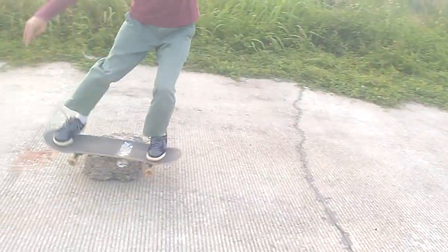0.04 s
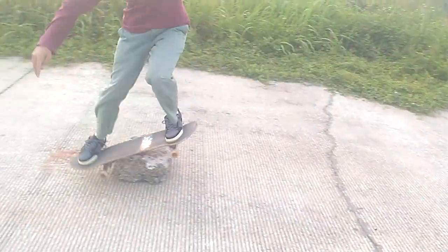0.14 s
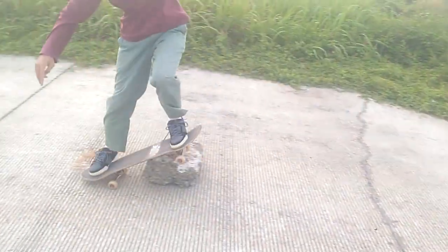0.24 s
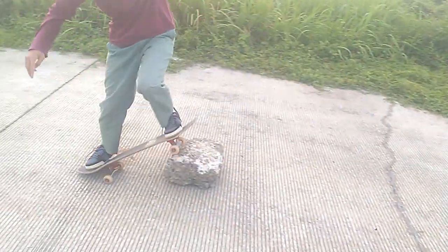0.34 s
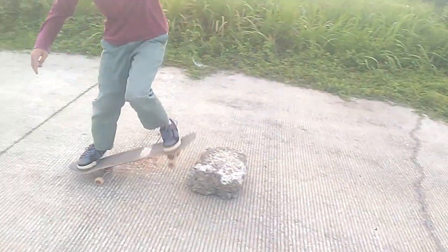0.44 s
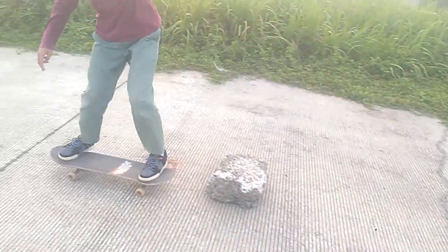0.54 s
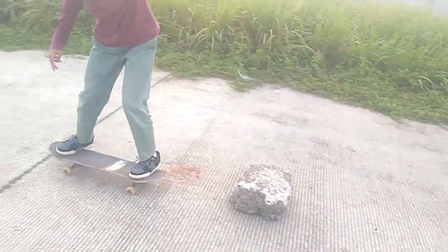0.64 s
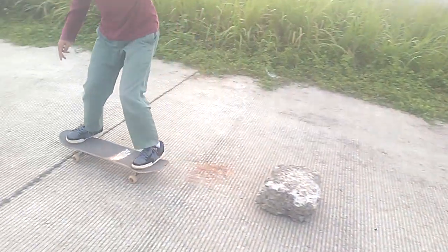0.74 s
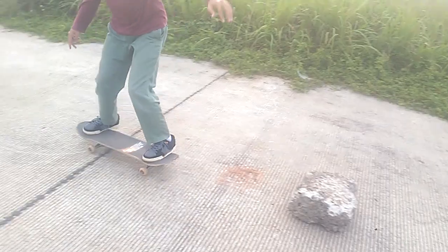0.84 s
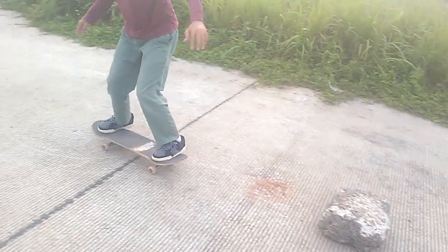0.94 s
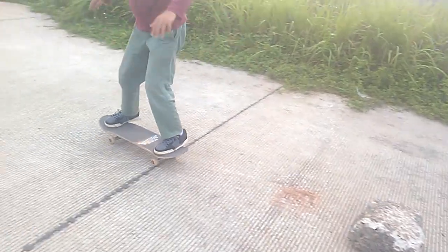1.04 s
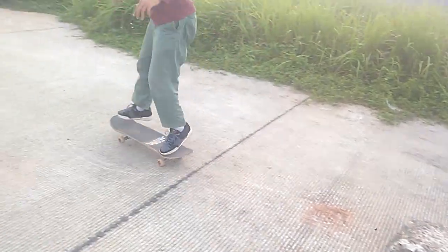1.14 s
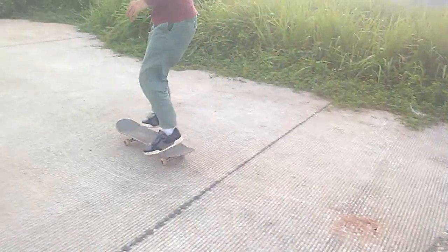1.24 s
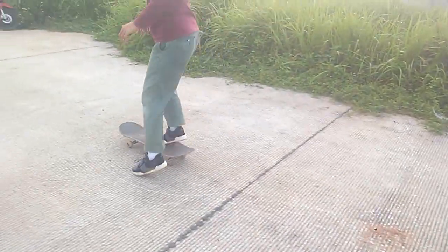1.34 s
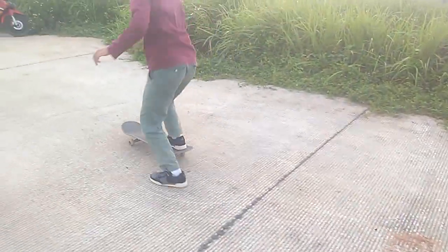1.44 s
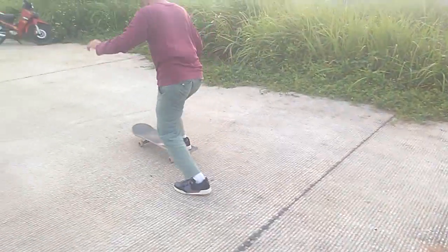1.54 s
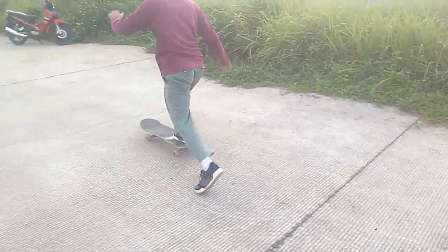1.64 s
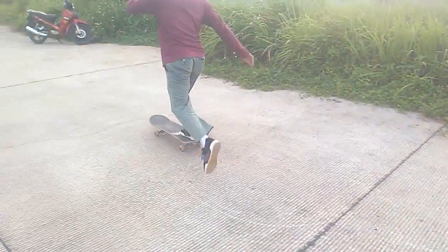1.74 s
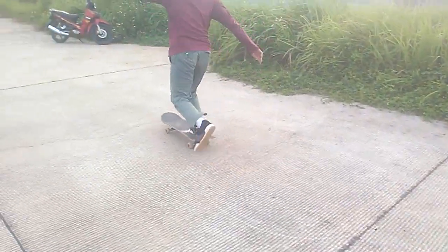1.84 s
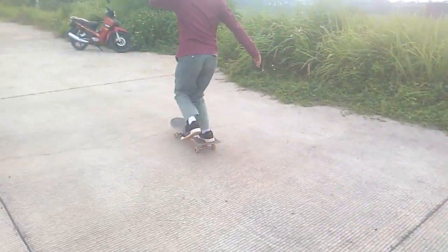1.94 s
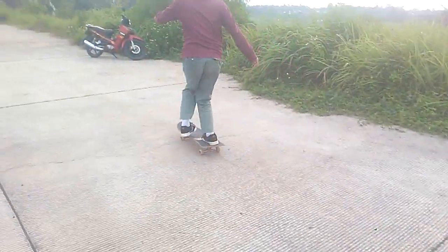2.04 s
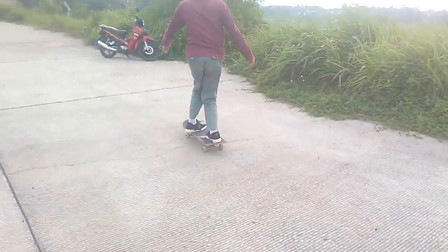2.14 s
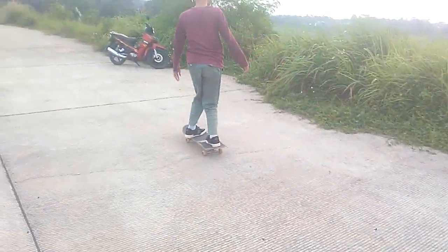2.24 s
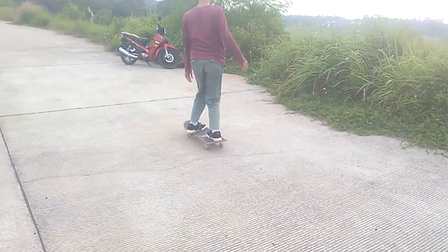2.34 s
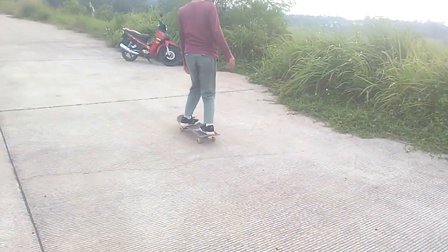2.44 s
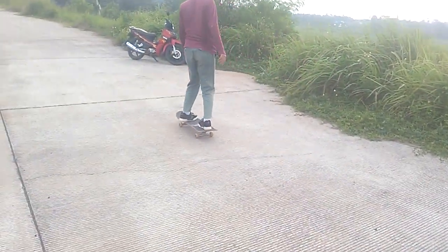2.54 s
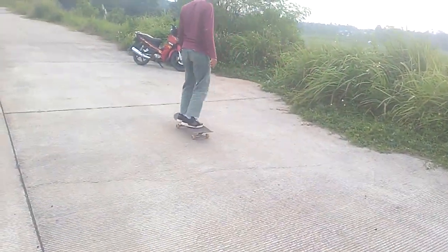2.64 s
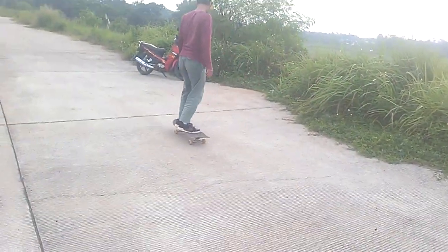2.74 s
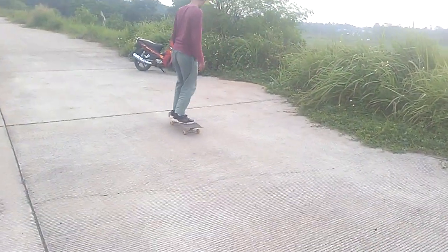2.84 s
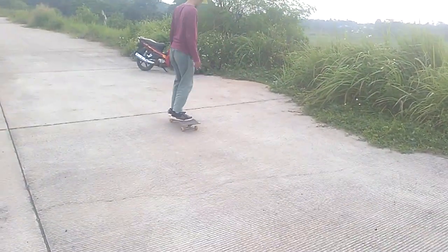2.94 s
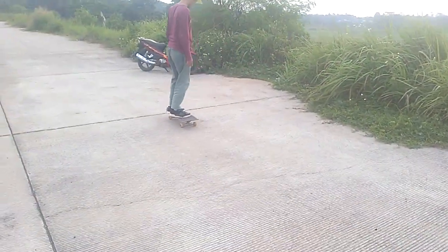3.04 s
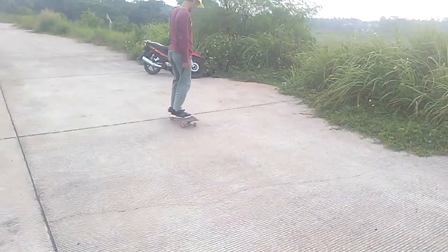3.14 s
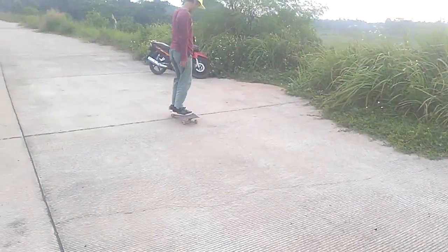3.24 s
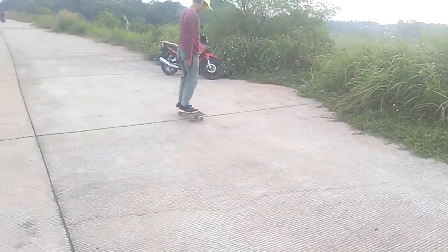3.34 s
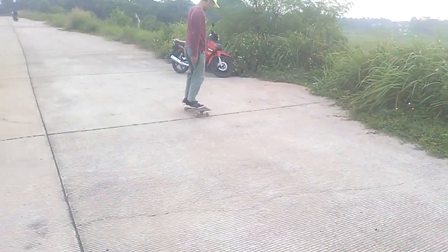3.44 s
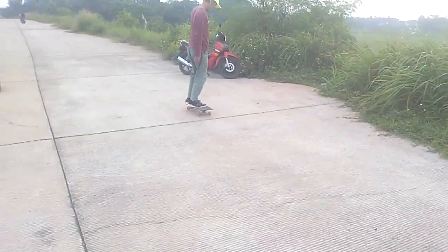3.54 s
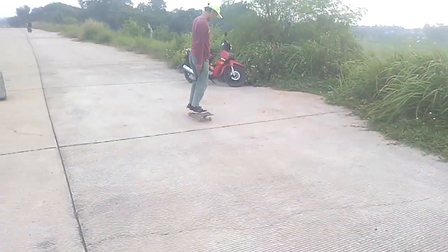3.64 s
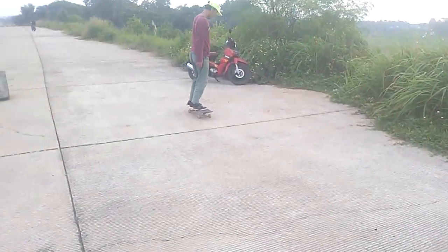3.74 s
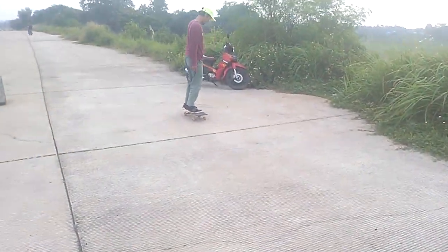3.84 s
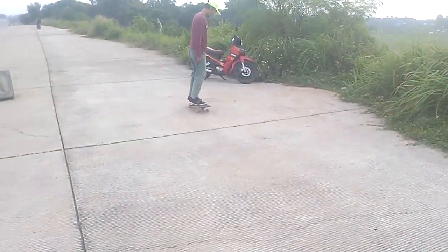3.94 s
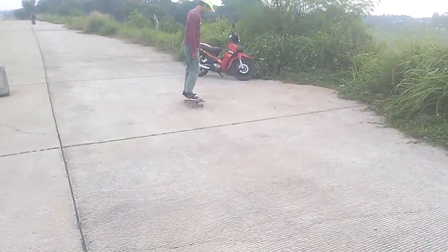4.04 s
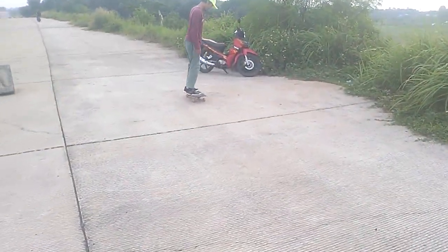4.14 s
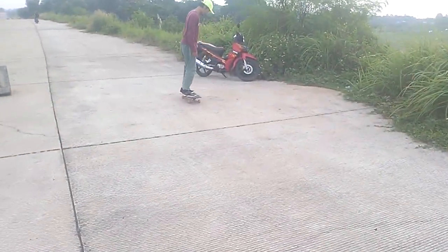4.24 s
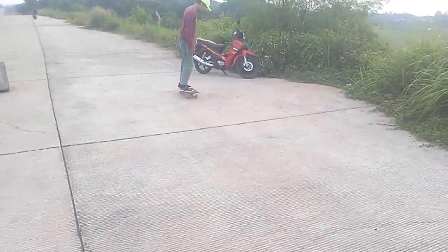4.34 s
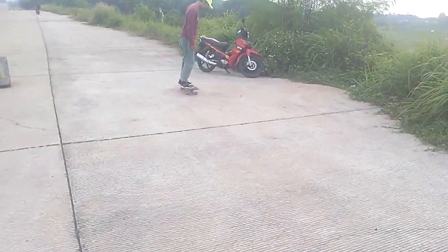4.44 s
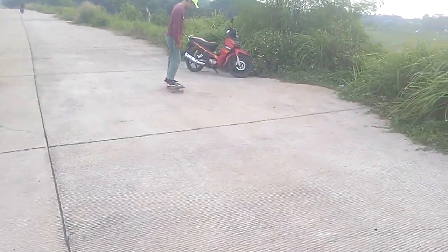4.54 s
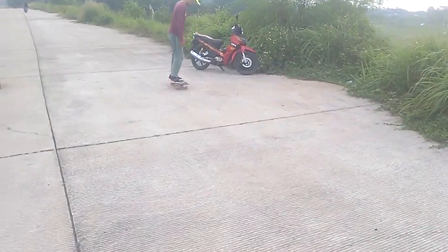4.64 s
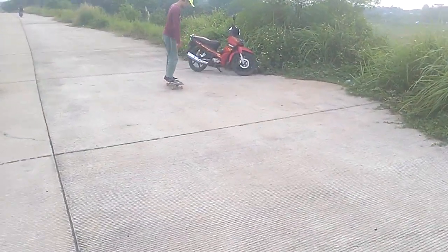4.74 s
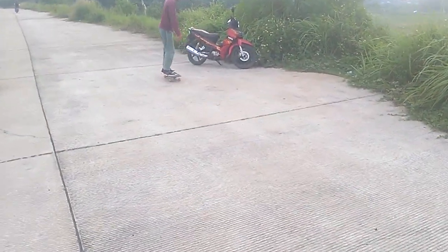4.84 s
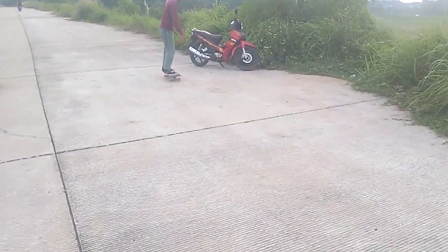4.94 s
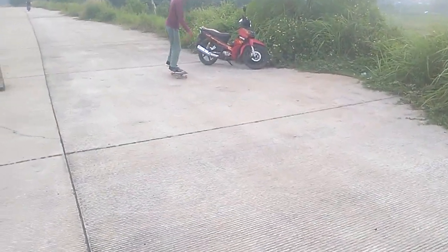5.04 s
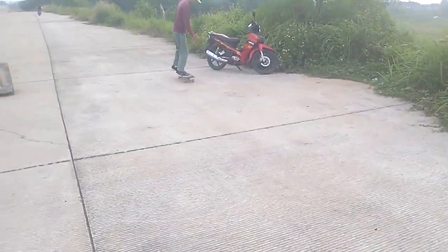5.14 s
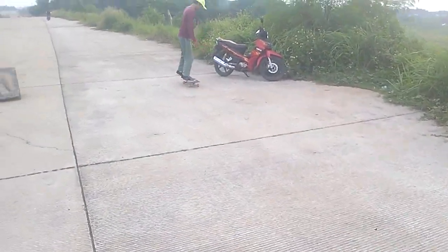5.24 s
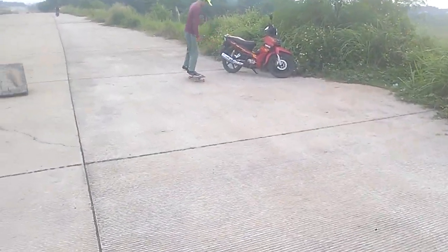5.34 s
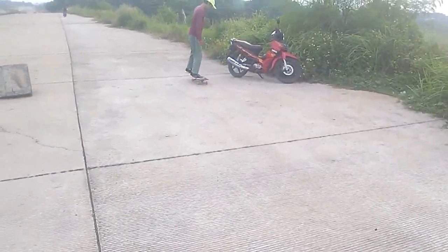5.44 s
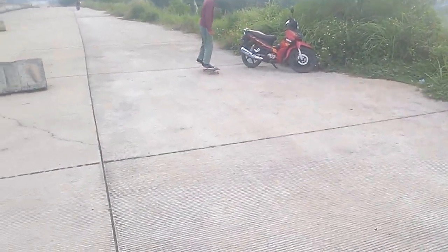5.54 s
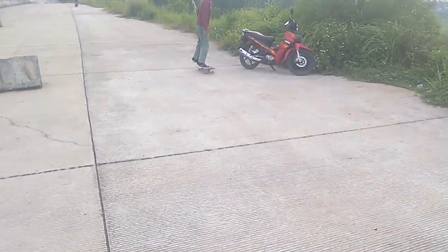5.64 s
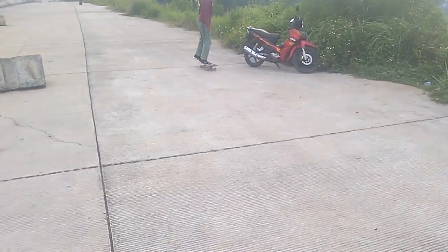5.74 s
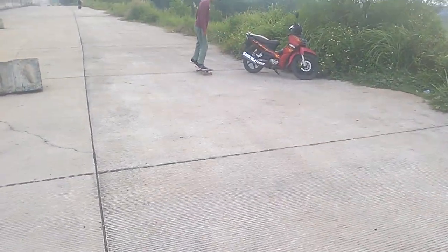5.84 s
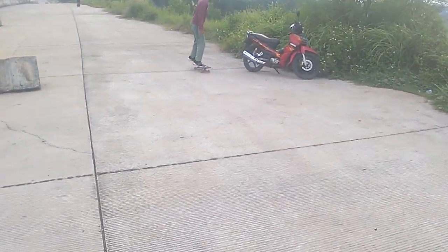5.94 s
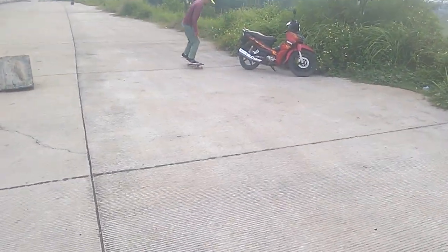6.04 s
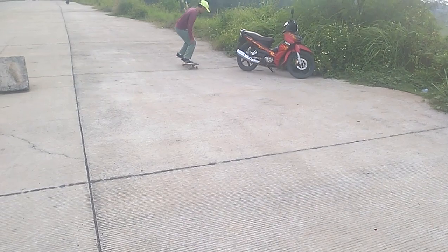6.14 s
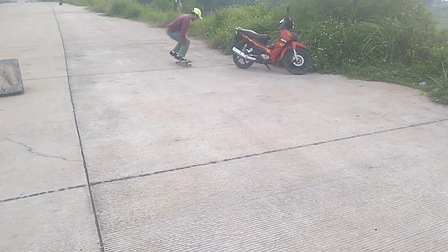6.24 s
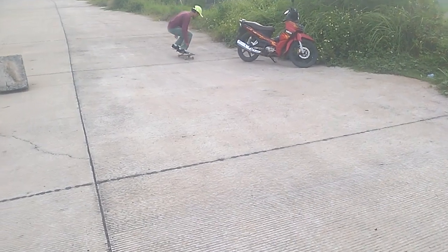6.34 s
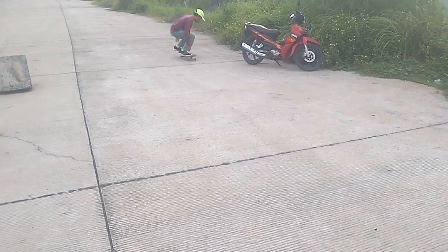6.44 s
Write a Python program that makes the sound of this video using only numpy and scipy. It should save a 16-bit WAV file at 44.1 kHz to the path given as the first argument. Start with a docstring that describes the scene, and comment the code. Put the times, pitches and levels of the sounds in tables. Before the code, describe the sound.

A skateboard scrapes and slams hard off a rock, very close to the microphone, with two overloaded wooden clacks in the first half second. Wheels then roar and rattle over rough concrete, with a cluster of knocks and brief squeaks between one and two seconds. A fluttering hum from the grooves follows as the board recedes along an open outdoor road, with faint low wind.

```python
"""Skateboard on a grooved concrete road

A board slides off a rock, lands with hard clacks close to the microphone and rolls away down the road.
Noise bursts shaped as wheel contact make roar, boom, rattle and hiss; sines at the groove rate make the hum.
Ringing deck modes make the slams and knocks, rough sine glides the squeaks, and low noise the wind.
The input clips wherever the sound passes full scale."""
import sys
import numpy as np
from scipy import signal
from scipy.fft import rfft, irfft
from scipy.io import wavfile
from scipy.ndimage import uniform_filter1d

SR = 44100
rng = np.random.default_rng(int(sys.argv[2]) if len(sys.argv) > 2 else 0)


def unload_audio(sound):
    """Save the sound as a 16-bit wav file, at the path given as the first command line argument."""
    columns = np.transpose(np.atleast_2d(sound))
    # keep every value between -1 and 1, then stretch to whole-number steps
    steps = np.round(np.clip(columns, -1, 1) * 32767)
    wavfile.write(sys.argv[1], SR, steps.astype(np.int16))


N = 286650
TIME = np.arange(N) / SR
HZ = np.fft.rfftfreq(N, 1 / SR)

# tone of the nearest concrete, rolled on or struck: frequency_hz, density_db (per Hz, relative)
NEAR_CONCRETE = [(300, -5.5), (420, -15), (530, 5.5), (660, 5.5), (880, 0), (1100, -4), (1450, -5),
                 (1950, -13.5), (2400, -17), (3000, -21), (3800, -32.5), (4700, -51.5)]
# tone of sand under or beside the wheels: frequency_hz, density_db (per Hz, relative)
SAND_TONE = [(3000, -3.5), (4000, -10), (4900, -17), (5900, -3), (6400, -5.5), (7200, -12.5), (8800, -1),
             (9800, -1), (11500, -11), (14000, -17.5)]


def amp(db):
    """Decibels to gain."""
    return 10 ** (np.asarray(db) / 20)


def unit(x):
    """Scales to rms 1."""
    return x / np.sqrt(np.mean(x ** 2) + 1e-20)


def curves(rows):
    """The columns of a table, joined by straight lines in time."""
    s, *columns = np.transpose(rows)
    return [np.interp(TIME, s, c) for c in columns]


def shape(points):
    """Gain at every frequency from a short spectrum that falls 30 dB per octave beyond its ends."""
    hz, db = np.transpose(points)
    octave, knots = np.log2(HZ + 1), np.log2(hz)
    beyond = abs(octave - np.clip(octave, knots.min(), knots.max()))
    return amp(np.interp(octave, knots, db) - 30 * beyond)


def colour(x, gain):
    """Minimum-phase filter with peak gain 1: each click rings after it strikes."""
    log_gain = np.log(np.maximum(gain / gain.max(), 1e-5))
    # folding the cepstrum onto positive times makes the filter causal
    cepstrum = irfft(log_gain, N) * (1 + np.sign(N / 2 - np.arange(N)))
    cepstrum[0] /= 2
    return irfft(rfft(x) * np.exp(rfft(cepstrum)), N)


def wander(rate_hz):
    """Slow random drift of rms 1: noise kept below about the given rate."""
    lowpass = np.exp(-(HZ / rate_hz) ** 2)
    return unit(irfft(rfft(rng.standard_normal(N)) * lowpass, N))


def add(mix, s, sound):
    """Mixes a sound in at time s."""
    part = mix[max(round(s * SR), 0):][:len(sound)]
    part += sound[:len(part)]


def swell(s, rise_s, fall_s):
    """A smooth rise to 1 at time s and a smooth fall, each 1/e at its given time from the peak."""
    width = np.where(TIME < s, rise_s, fall_s)
    return np.exp(-np.minimum(abs(TIME - s) / width, 6) ** 2)


def ramp(s, length_s):
    """A step from 0 to 1 around time s."""
    return np.clip((TIME - s) / length_s + .5, 0, 1)


def wind():
    """Low, lumpy buffeting at the microphone: noise whose level sways, with gusts and lulls."""
    # gusts and lulls: peak_s, half_length_s, level_db (over the breeze)
    gust_rows = [(0.22, 0.039, 13), (0.419, 0.06, 21), (0.702, 0.17, 18.5), (1.043, 0.073, 6.5),
                 (1.8, 0.33, -5.5), (2.426, .06, 10), (3.218, 0.089, 4), (3.596, 0.15, 0),
                 (3.935, 0.19, -4), (4.177, 0.066, 9), (4.914, .07, 7), (5.485, 0.035, 6),
                 (6.373, 0.027, -7)]
    # buffeting at the microphone: frequency_hz, density_db (per Hz, relative)
    buffet_tone = [(15, -68), (30, -14), (55, -1), (85, 0.5), (120, -3), (180, -8), (400, -34)]
    breeze_db, sway_db, sway_hz = -50, 1.4, 8
    lumps = amp(0.92 * wander(24)) * rng.standard_normal(N)
    gusts_db = sum(db * swell(s, half, half) for s, half, db in gust_rows)
    level_db = breeze_db + sway_db * wander(sway_hz) + gusts_db
    return amp(level_db) * unit(colour(lumps, shape(buffet_tone)))


def wheel_levels():
    """Roar, boom, rattle, hiss and hum in dB, from the slab, the distance and the load on the wheels."""
    # the rock, then each concrete slab, from close by and before the trims in the last lines:
    # start_s, roar_db, boom_db (deck), rattle_db (trucks), hiss_db (sand), hum_db (grooves)
    slab_rows = [(0.0, -44, -54, -42, -73, -60), (0.18, -38.5, -32.5, -39.5, -61, -50),
                 (1.0, -33.5, -37, -31, -59, -46), (2.25, -33, -37, -36.5, -58, -43.5),
                 (3.0, -33.5, -31, -38, -58.5, -36.5), (3.6, -38.5, -39.5, -40.5, -61.5, -41),
                 (4.65, -37, -38, -37.5, -58, -41.5), (5.2, -32, -35, -37, -55.5, -50),
                 (6.17, -35, -39.5, -39.5, -58.5, -46)]
    # the rider's weight comes down: peak_s, rise_s, fall_s, roar_rise_db, boom_rise_db
    press_rows = [(0.242, 0.015, 0.016, 19, 14), (0.41, 0.033, 0.072, 10, 5.5),
                  (0.51, 0.08, 0.13, 15.5, 2.5), (0.76, 0.11, 0.073, 1.5, 2),
                  (0.991, 0.063, 0.053, 1.5, 6.5), (1.35, .03, 0.071, 0.5, 8), (1.49, .04, 0.26, 4, 5),
                  (2.17, 0.14, 0.17, 2, 4.5), (2.72, 0.023, 0.037, 1, 8.5),
                  (2.891, 0.049, 0.062, 12.5, 19.5), (4.19, 0.043, 0.13, -0.5, 4),
                  (5.25, 0.046, 0.056, 4, -0.5), (5.47, 0.028, 0.085, 5, 3.5), (6.0, 0.041, 0.11, 5.5, -2),
                  (6.13, 0.054, 0.026, 4, 6.5)]
    # the rider takes weight off: start_s, end_s, roar_drop_db, boom_drop_db, hiss_drop_db
    lift_rows = [(0.819, 0.935, 6, 7.5, 8.5), (1.087, 1.224, 12.5, 17, 4.5), (1.192, 1.32, 9, 19, 2.5),
                 (1.7, 1.775, 10, 6.5, -2.5), (2.996, 3.091, 6, 4, 9), (3.73, 3.86, 1, 0, 6),
                 (3.934, 4.03, 3, 12.5, -2), (4.994, 5.12, 3.5, 6.5, 9), (5.72, 5.896, 3, 2.5, 1),
                 (6.203, 6.366, 4.5, 5, 3)]
    # the wheels skid sideways in a turn: peak_s, half_length_s, rattle_rise_db
    skid_rows = [(0.01, 0.048, 15.5), (1.072, 0.078, 4), (1.39, 0.13, 1), (4.034, .07, 8.5),
                 (5.01, 0.028, 6), (6.005, 0.06, 5)]
    near_m, leaves_s, away_m_per_s = 1.88, 0.91, 1.343
    highs_fade = 1.34  # the highs lose this many dB for each dB of the lows
    slab_change_s = 0.13  # both axles cross a joint in this time
    unweight_s = 0.038

    starts, *levels = np.transpose(slab_rows)
    slab = np.searchsorted(starts[1:], TIME)
    smoothed = (uniform_filter1d(db[slab], round(slab_change_s * SR)) for db in levels)
    roar, boom, rattle, hiss, hum = smoothed
    far = 20 * np.log10(1 + away_m_per_s * np.maximum(TIME - leaves_s, 0) / near_m)
    press, thump = sum(np.outer(dbs, swell(s, rise, fall)) for s, rise, fall, *dbs in press_rows)
    lift, boom_lift, hiss_lift = sum(np.outer(dbs, ramp(s, unweight_s) - ramp(end, unweight_s))
                                     for s, end, *dbs in lift_rows)
    skid = sum(db * swell(s, half, half) for s, half, db in skid_rows)
    return (roar - 2 - far + press - lift + 0.44 * skid,
            boom - 3 - far + thump - boom_lift,
            rattle - 3 - highs_fade * far + 0.74 * press - 0.58 * lift + skid,
            hiss - highs_fade * far + 0.33 * press - hiss_lift + 0.53 * skid,
            hum - far + thump - boom_lift)


def weaving():
    """Groove rate, highest when the board runs square to the grooves, and the lean to either side in dB."""
    # speed, with one push of the foot: time_s, groove_rate_hz (before the weave)
    speed_rows = [(1.35, 105), (1.85, 94), (2.35, 107), (2.8, 108), (3.2, 103), (5.0, 98.5)]
    swing_s, square_s, depth, lean_peak_db = .645, 2.18, .04, 4.5
    swing = 2 * np.pi * (TIME - square_s) / swing_s
    groove_hz = curves(speed_rows)[0] * (1 + depth * np.cos(swing))
    return groove_hz, lean_peak_db * np.sin(swing)


def contact(bumps, per_s, spread_db, smooth):
    """Force on the wheels: many sand grains and a few large stones, pressed harder on each bump."""
    size = amp(spread_db * np.minimum(rng.exponential(1, N), 3))
    grains = size * rng.choice([-1, 1], N) * (rng.random(N) < per_s / SR)
    return unit((unit(grains) + smooth * rng.standard_normal(N)) * bumps)


def shifting(x, patch_db):
    """Resonances come and go as the rider's weight and the wheels' contact shift."""
    z = signal.stft(x, nperseg=512, noverlap=384)[2]
    field = rng.standard_normal(z.shape)
    for _ in range(2):
        across_pitch = uniform_filter1d(field, size=3, axis=0)
        field = uniform_filter1d(across_pitch, size=16, axis=1)
    patches = amp(patch_db * unit(field))
    return signal.istft(z * patches, nperseg=512, noverlap=384)[1][:N]


def rolling():
    """Rough concrete shakes wheels, deck and trucks; the grooves beat them at a rate set by the speed."""
    # tone of the wheels on the middle and far stretches: frequency_hz, density_db (per Hz, relative)
    middle_tone = [(400, -10), (550, 1), (720, -0.5), (950, -6.5), (1150, -9), (1450, -7), (1720, -16),
                   (1950, -14), (2400, -26), (3000, -22), (4700, -49.5)]
    far_tone = [(300, -80), (420, -7.5), (550, 2.5), (820, 3), (1100, -5), (1400, -1), (1620, -4.5),
                (1900, 1), (2400, -11.5), (2950, -8.5), (3800, -24.5), (4700, -34)]
    # boom of the deck: frequency_hz, density_db (per Hz, relative)
    boom_tone = [(90, -7.5), (150, -9.5), (215, -2.5), (260, -2), (320, 1), (400, -7), (520, -27.5)]
    roar_db, boom_db, rattle_db, hiss_db, hum_db = wheel_levels()
    groove_hz, lean_db = weaving()
    phase = 2 * np.pi * np.cumsum(groove_hz * (1 + .02 * wander(30))) / SR
    wheel_turn = np.cos(phase / 5.7)  # 5.7 grooves in each turn of a wheel
    # the load pulses at each groove and, more weakly, once in each turn of a wheel
    bumps = amp(2.36 * np.cos(phase) + 0.22 * wheel_turn + 2.7 * wander(68))
    coarse = shifting(contact(bumps, per_s=2200, spread_db=3, smooth=0.62), patch_db=3)
    fine = shifting(contact(bumps, per_s=1800, spread_db=1, smooth=0.94), patch_db=2)

    # each stretch of road has its own grain and tone, crossfaded into the next
    past_near = np.clip((TIME - 2.55) / .3, 0, 1)
    past_middle = np.clip((TIME - 4.6) / .5, 0, 1)
    stretches = ((1 - past_near, coarse, NEAR_CONCRETE),
                 (past_near - past_middle, coarse, middle_tone),
                 (past_middle, fine, far_tone))
    low = 1 / (1 + (HZ / 1050) ** 12)  # roar below 1050 Hz, rattle above
    out = np.zeros(N)
    for share, force, tone in stretches:
        spectrum = rfft(colour(force, shape(tone)))
        roar = amp(roar_db) * unit(irfft(spectrum * low, N))
        rattle = amp(rattle_db) * unit(irfft(spectrum * (1 - low), N))
        out += np.sqrt(abs(share)) * (roar + rattle)
    boom = amp(boom_db) * unit(colour(fine, shape(boom_tone)))

    # the deck radiates the second and third multiples of the groove rate best;
    # leaning one way brings out the first two multiples, the other way the rest
    multiples_db = [hum_db - 9 + lean_db, hum_db - 0.5 + lean_db,
                    hum_db + 3.5 - lean_db, hum_db - 8.5 - lean_db, hum_db - 15.5 - lean_db]
    hum = sum(amp(db) * np.sin((k + 1) * phase) for k, db in enumerate(multiples_db))
    flutter = amp(2 * wander(28))
    on_grooves = np.interp(TIME, [1.3, 1.5, 4.8, 5.0], [0, 1, 1, 0])

    # fine sand hisses under the wheels
    sand_load = amp(1.2 * np.cos(phase) + 2.07 * wander(40))
    sand = shifting(contact(sand_load, per_s=5100, spread_db=6.0, smooth=0.66), patch_db=0.7)
    hiss = amp(hiss_db) * unit(colour(sand, shape(SAND_TONE)))
    return out + boom + on_grooves * flutter * hum + hiss


def deck(t, tilt_db):
    """The ring of the board after one blow; the rider's weight detunes it a little each time."""
    # modes of deck and trucks: pitch_hz (before detuning), level_db (before the tilt), t60_s
    mode_rows = [(127, -27.5, .12), (229.7, -14, 0.15), (326, -20, 0.061), (533, -11.5, 0.063),
                 (573, -3.5, 0.06), (633, -1.5, 0.03), (692, -3.5, 0.045), (766, 3.5, 0.018),
                 (1029, -7.5, 0.055), (1163, -1, 0.028), (1345, -2, 0.023), (1736, 0.5, 0.016),
                 (1918, -4.5, 0.023), (2278, -15.5, 0.033), (2820, -19.5, 0.015), (3500, -29, 0.026)]
    hz, db, t60 = np.transpose(mode_rows)[:, :, None]
    gains = amp(db + tilt_db * np.log2(hz / 900))
    tuned = hz * (1 + 0.03 * rng.standard_normal(hz.shape))
    # the low bending modes start together, the higher ones in alternating directions
    sides = np.where(hz < 750, 1, (-1) ** np.arange(len(hz))[:, None])
    modes = sides * gains * amp(-60 * t / t60) * np.sin(2 * np.pi * tuned * t)
    attack = 1 - np.exp(-t / .0006)
    return modes.sum(0) * attack / np.linalg.norm(gains)


def slams():
    """Each hard blow rings the board, with a short crunch of concrete and a weaker burst of bright noise."""
    # the board slamming on rock and road: time_s, strength_db, tilt_db_per_octave (of the ring)
    slam_rows = [(0.0219, -5, 7), (0.0282, -14.5, -2.5), (0.137, -19, -3.5), (0.183, 2.5, -0.5),
                 (0.1881, 3.5, 2), (0.2391, -6.5, 7), (0.245, -9.5, -7.5), (0.39, -10.5, -9),
                 (0.467, -8, 0), (0.501, 4, 4.5), (0.504, 4.5, 0), (0.518, -3.5, 7.5)]
    # the bright burst at each blow: frequency_hz, density_db (per Hz, relative)
    burst_tone = [(1500, 7.5), (3000, 0.5), (4300, -6), (5200, -6), (6200, -2), (7400, -17.5), (9000, -7),
                  (14000, -29)]
    out, crush, burst = np.zeros(N), np.zeros(N), np.zeros(N)
    t = np.arange(SR // 7) / SR
    for s, db, tilt_db in slam_rows:
        add(out, s, 0.82 * amp(db) * deck(t, tilt_db))
        add(crush, s, amp(db - 60 * t / .03))
        add(burst, s, amp(0.89 * db - 18.5 - 60 * t / 0.02))
    grit = rng.standard_normal(N)
    crunch = colour(crush * grit, shape(NEAR_CONCRETE)) / 2
    return out + crunch + colour(burst * grit, shape(burst_tone))


def squeaks():
    """Deck and wheels scrub sideways, sticking and slipping in short, rough glides."""
    # the scrubs: start_s, length_s, start_hz, end_hz (both before the waver), level_db (before the grip)
    squeak_rows = [(0.123, 0.06, 2040, 1900, -32), (0.173, 0.034, 630, 640, -22),
                   (1.011, 0.029, 3040, 3460, -41), (1.051, 0.041, 1430, 1633, -25.5),
                   (1.11, 0.093, 2350, 2500, -55), (1.215, 0.072, 730, 760, -42),
                   (1.325, 0.075, 1715, 2034, -34), (3.335, 0.02, 1710, 1780, -48.5),
                   (3.943, 0.33, 1198, 1290, -46.5), (4.97, 0.077, 1358, 1196, -46.5),
                   (5.589, 0.058, 3050, 2860, -57), (5.922, 0.17, 1900, 1916, -50)]
    out, waver, grip = np.zeros(N), wander(215), amp(6.5 * wander(130))
    for s, length, start_hz, end_hz, db in squeak_rows:
        span = np.flatnonzero((TIME >= s) & (TIME < s + length))
        hz = np.linspace(start_hz, end_hz, len(span)) * (1 + .07 * waver[span])
        glide = np.sin(2 * np.pi * np.cumsum(hz) / SR)
        fade = signal.windows.tukey(len(span), .5)
        add(out, s, amp(db) * grip[span] * fade * glide)
    return out


def knocks():
    """A wheel strikes a stone or an edge: a snap of a few cycles, then the deck answers and sand spits."""
    # the larger stones and joints: time_s, level_db (of the snap), pitch_hz,
    # ring_db (deck over snap, before a 7.5 dB cut)
    knock_rows = [(0.346, -23, 640, -10), (0.7852, -27, 833, 8), (1.0327, -14.5, 890, -14),
                  (1.061, -23, 1430, -18), (1.177, -13.5, 885, -7), (1.1799, -15, 960, -4),
                  (1.187, -17.5, 1640, 2), (1.2232, -23.5, 1230, 3), (1.2431, -20, 1480, 1),
                  (1.326, -19, 1600, -6), (1.3648, -14.5, 1590, -18), (1.3897, -14.5, 1340, -13),
                  (1.466, -22, 1600, 15.5), (1.4704, -14, 1310, -12), (1.6198, -20, 1090, -14),
                  (1.7848, -17.5, 1220, 2.5), (1.8305, -21, 1180, -3), (1.8634, -19, 1160, -10),
                  (1.9409, -13.5, 1120, -24), (1.9546, -18.5, 734, -17.5), (1.9878, -16.5, 1100, -1),
                  (2.007, -18, 1200, 0), (2.0803, -9, 1310, -28), (2.2, -18, 1080, -3),
                  (2.22, -20, 760, -8), (2.5025, -26, 1540, 8.5), (2.6623, -26, 1540, 2),
                  (2.7172, -22.5, 780, 6), (2.7263, -24.5, 739, -12), (2.8787, -25, 915, 8.5),
                  (3.2306, -27, 750, 5), (4.0468, -23, 1400, -17), (4.7038, -32.5, 1300, -8),
                  (5.0072, -33, 1180, 0), (5.056, -34, 730, 3), (5.2556, -32.5, 920, 5),
                  (5.4374, -30, 810, 3), (5.8661, -31.5, 1840, -1)]
    out, spit, t = np.zeros(N), np.zeros(N), np.arange(SR // 12) / SR
    # a short ping of the truck
    ping = amp(-2.0 - 60 * t / 0.0084) * np.sin(2 * np.pi * 2350 * t)
    tick = ping * (1 - np.exp(-t / 0.00059)) ** 2
    for s, db, hz, ring_db in knock_rows:
        age = t * hz / .6
        snap = (age / 2) ** 2 * np.exp(2 - age) * np.sin(2 * np.pi * hz * t)
        # a sharper snap wakes higher modes
        ring = deck(t, tilt_db=4 + 6 * np.log2(hz / 900))
        add(out, s, amp(db) * (snap + tick + amp(ring_db - 7.5) * ring))
        add(spit, s, amp(db - 33.5 - 60 * t / 0.045))
    return out + colour(spit * rng.standard_normal(N), shape(SAND_TONE))


def roadside(x, wet_db, t60):
    """Faint, short scatter from the grass and bushes along the road: sparse random echoes after 8 ms."""
    t = np.arange(SR // 2) / SR
    echoes = rng.standard_normal(len(t)) * (rng.random(len(t)) < 2000 / SR)
    taps = echoes * amp(-60 * t / t60) * (t > .008)
    return x + amp(wet_db) * signal.fftconvolve(x, taps / np.linalg.norm(taps))[:N]


def scene():
    """The board on the open road, and the wind."""
    board = rolling() + slams() + knocks() + squeaks()
    # the board's sound is cut below about 70 Hz
    bass_cut = signal.butter(2, 70, "highpass", fs=SR, output="sos")
    board = signal.sosfilt(bass_cut, board)
    return (roadside(board, wet_db=-13, t60=0.35) + wind())[None]


def record(dry):
    """The loudest blows overload the input at full scale; then a low-pass limits the band."""
    clipped = np.clip(dry, -1, 1)
    edge_hz = 14300
    lowpass = signal.firwin(511, edge_hz, window=("kaiser", 9), fs=SR)
    return signal.oaconvolve(clipped, lowpass[None], "same")


dry = scene()
out = record(dry)
unload_audio(out)
```